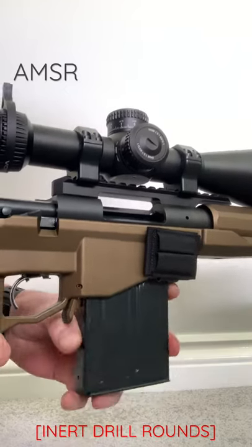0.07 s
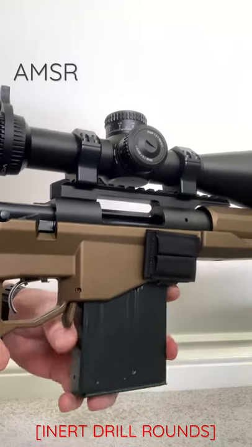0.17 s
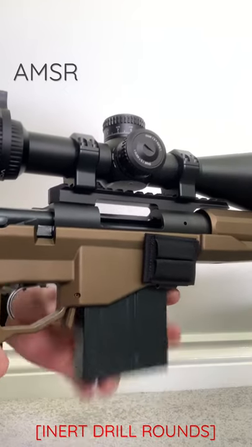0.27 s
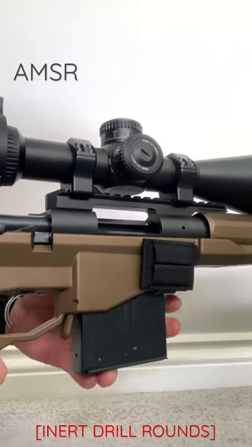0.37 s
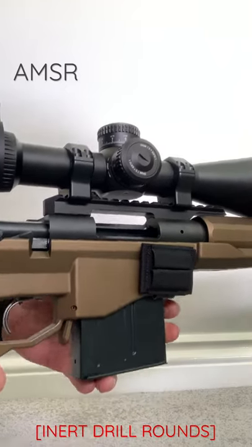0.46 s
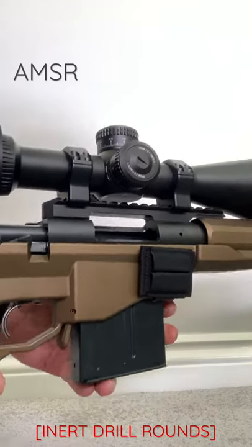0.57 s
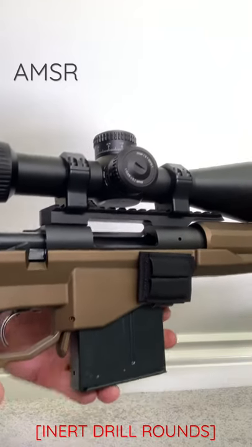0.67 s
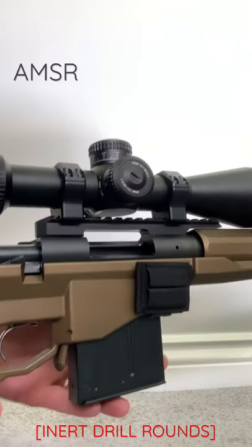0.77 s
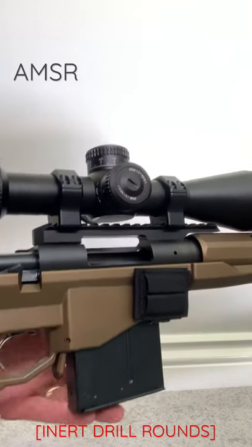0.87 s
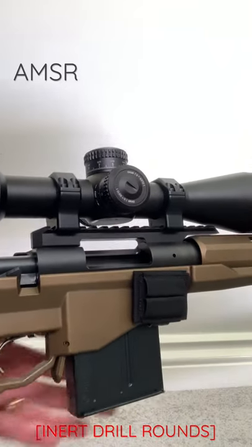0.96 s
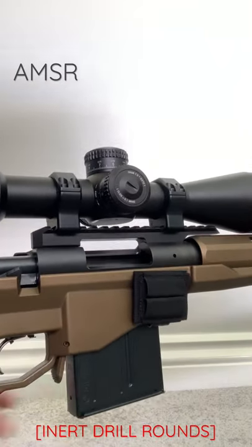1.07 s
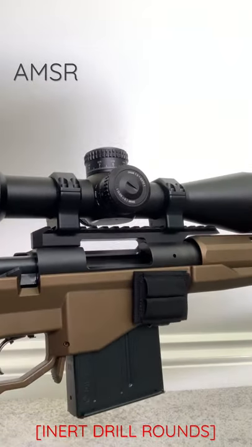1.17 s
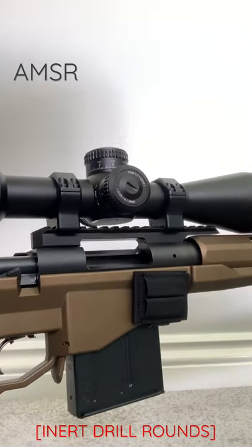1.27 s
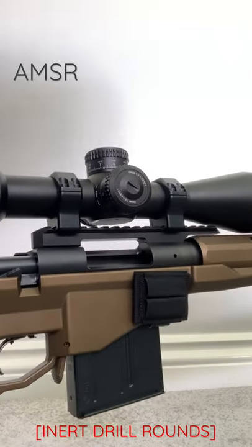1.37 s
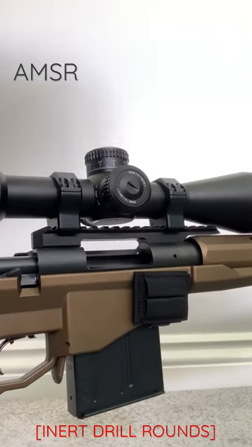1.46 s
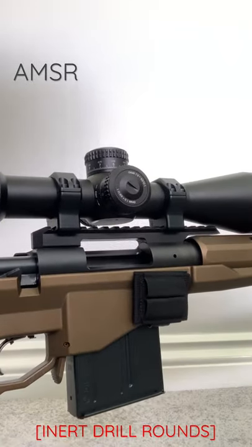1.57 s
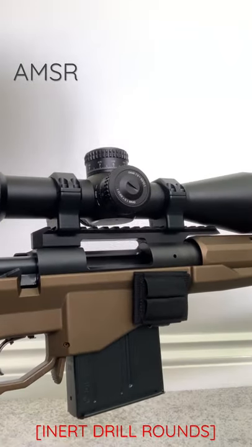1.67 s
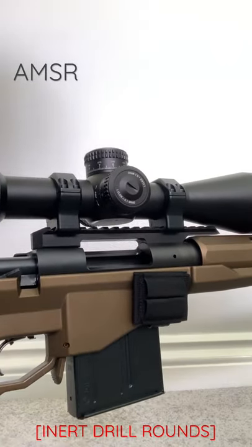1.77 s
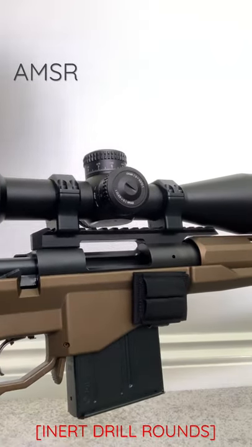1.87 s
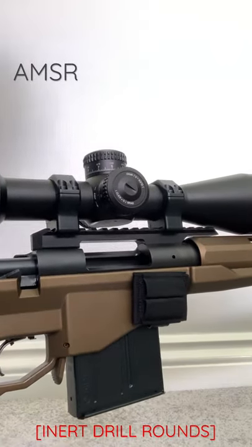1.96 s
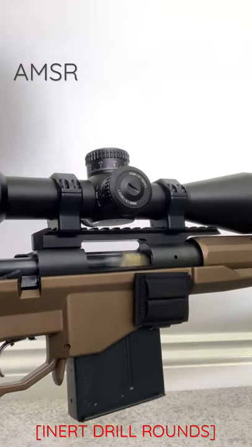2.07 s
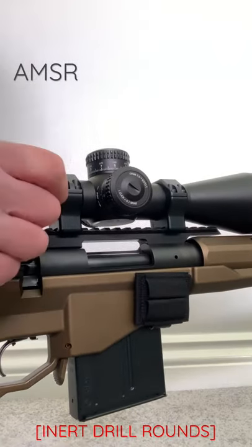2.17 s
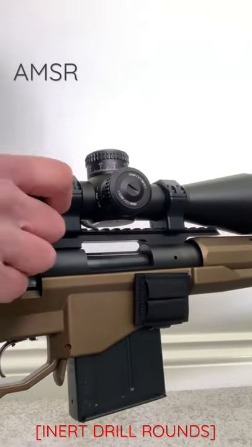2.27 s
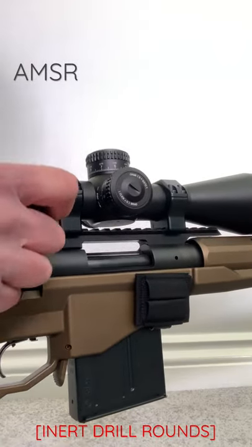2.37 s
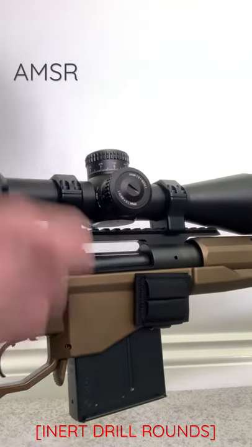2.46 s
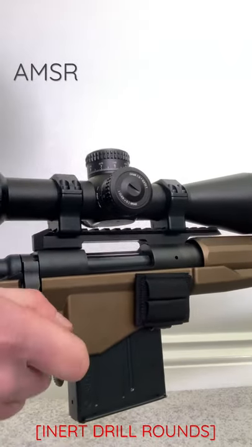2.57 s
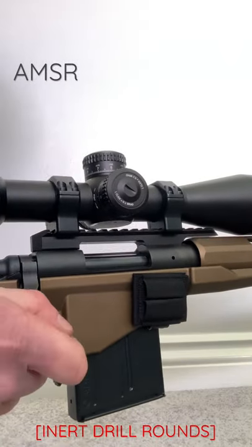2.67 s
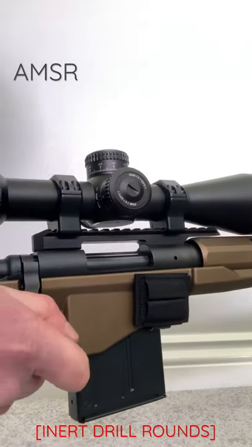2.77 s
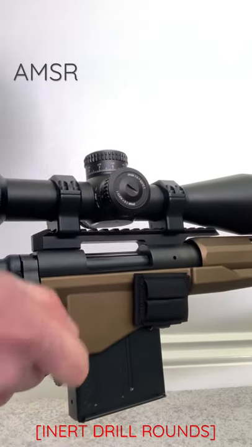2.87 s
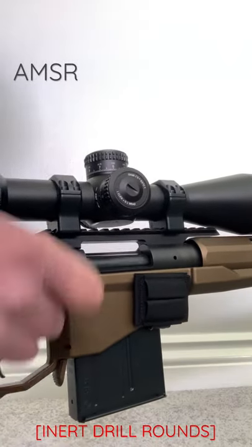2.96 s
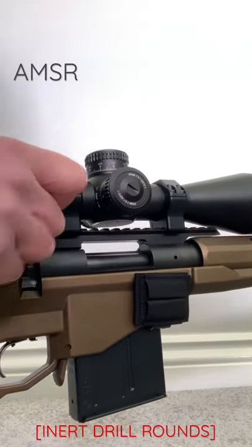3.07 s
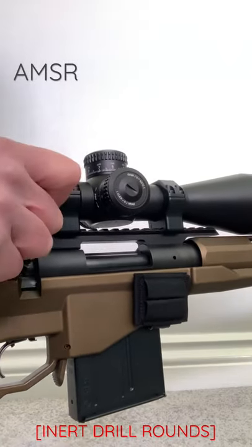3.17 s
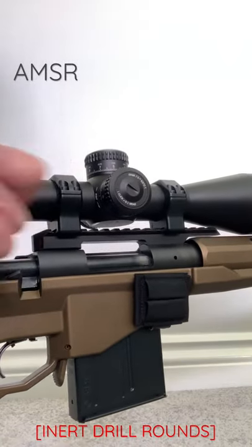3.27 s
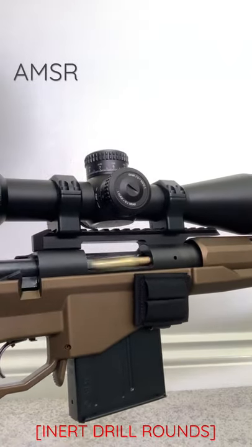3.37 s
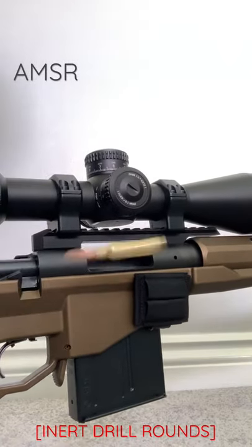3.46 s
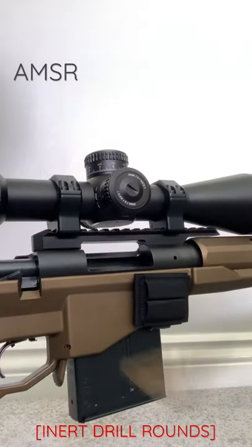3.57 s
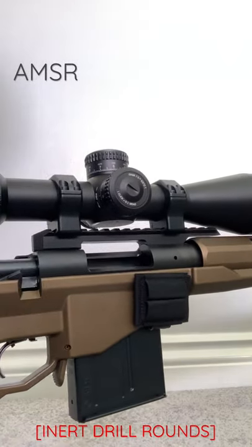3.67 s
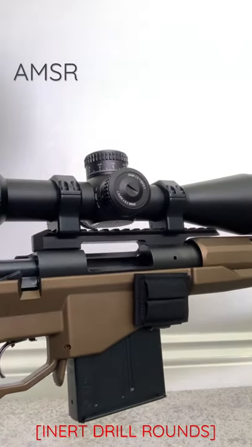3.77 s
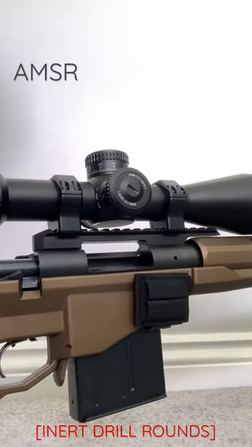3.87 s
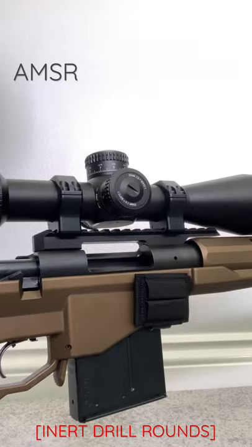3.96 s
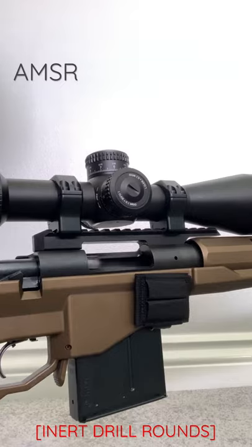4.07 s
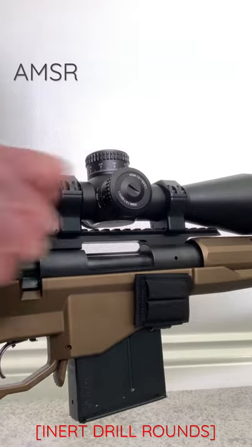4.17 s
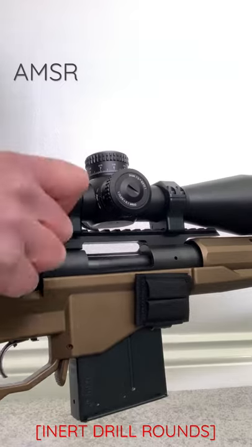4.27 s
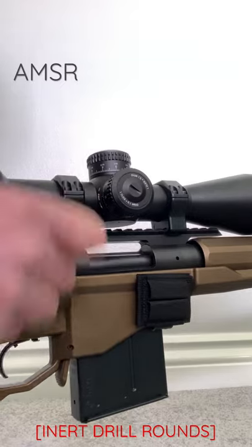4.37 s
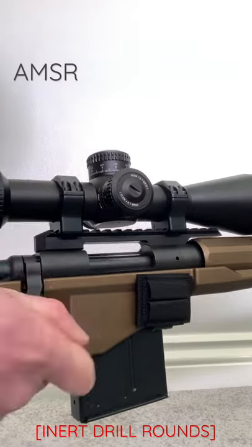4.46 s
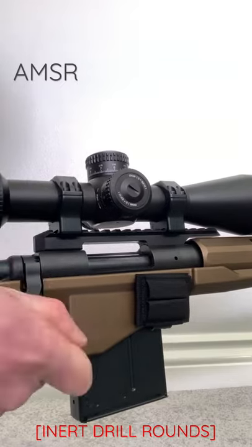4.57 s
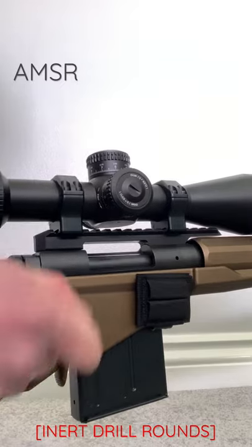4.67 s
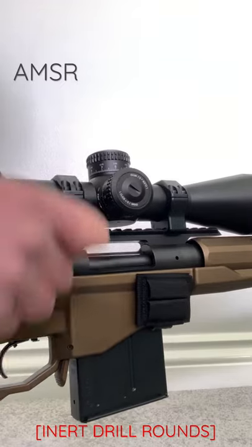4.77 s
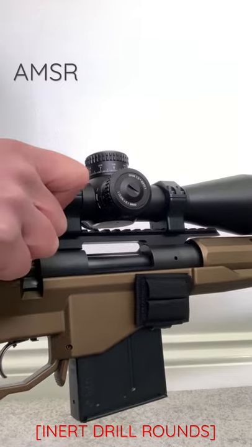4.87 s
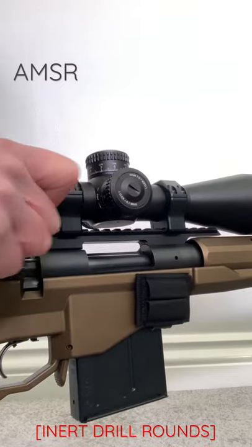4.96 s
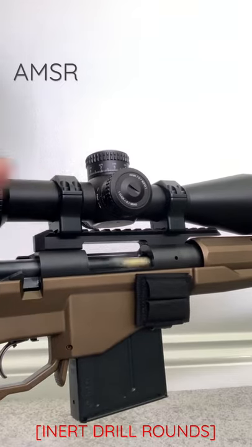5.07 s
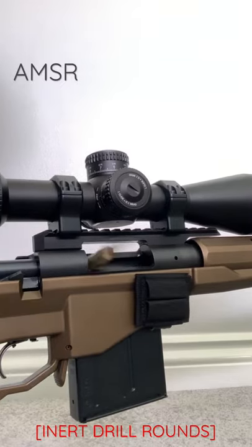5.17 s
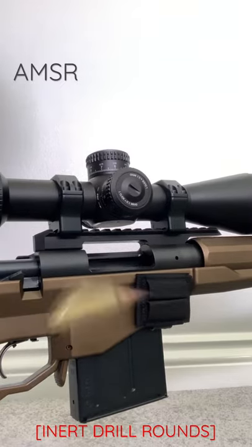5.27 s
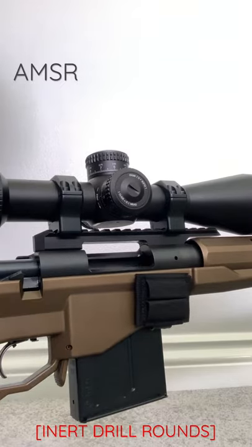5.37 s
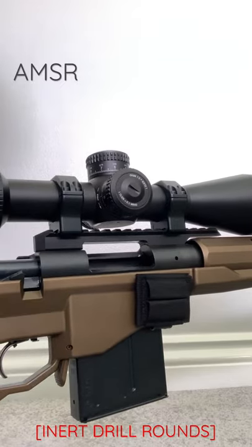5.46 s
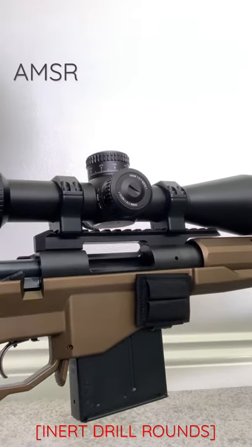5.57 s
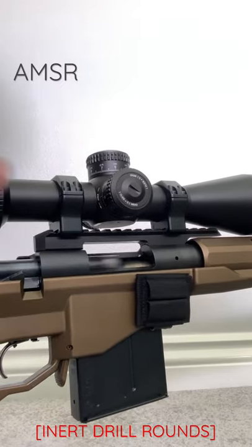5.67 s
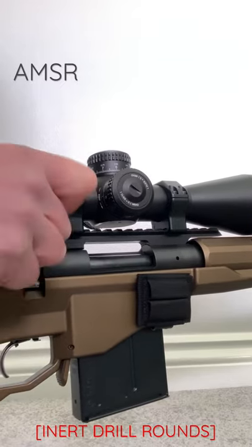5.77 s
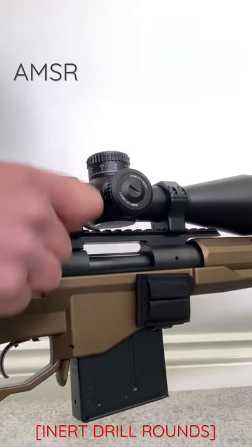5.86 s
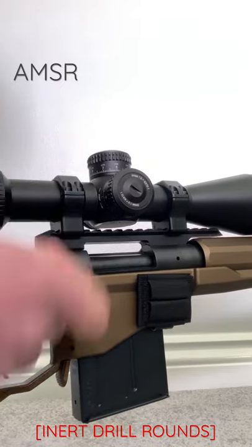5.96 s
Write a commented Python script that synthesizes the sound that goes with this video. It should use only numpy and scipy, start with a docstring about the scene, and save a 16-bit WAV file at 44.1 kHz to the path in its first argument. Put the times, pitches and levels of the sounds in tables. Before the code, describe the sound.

A magazine scrapes and clicks into a rifle, then the steel bolt is worked three times with sharp clacks and slides in a small room.

```python
"""A magazine scrapes and clicks into a bolt-action rifle, then the bolt is worked three times.
Steel parts slide, snap against their stops and ring. The rifle rocks on a carpeted floor and its
stock thumps. Two ejected brass rounds ring as they tumble through the air, then thud on the carpet.
A small room echoes, and a microphone with two openings (ports) hears it all in stereo."""
import sys
import numpy as np
from scipy import signal
from scipy.fft import rfft, irfft, next_fast_len
from scipy.io import wavfile
from scipy.ndimage import uniform_filter1d

SR = 44100
rng = np.random.default_rng(int(sys.argv[2]) if len(sys.argv) > 2 else 0)


def unload_wav(signal):
    """Save mono or channel-first audio to the path in sys.argv[1] as 16-bit WAV at rate SR, clipped to [-1, 1]."""
    wavfile.write(
        sys.argv[1],
        SR,
        np.round(np.clip(np.atleast_2d(signal).T, -1, 1) * 32767).astype(np.int16),
    )


N = 265923

# Movements of magazine, hand and bolt:
# start_s, length_s, end_friction_db, swell_db, end_hollow_hz, end_brightness_db
STROKES = [(0, .1, -56, -19, 1320, -4), (0.22, .07, -31, 29, 1200, 3),
           (0.362, .19, -61.5, -6.5, 1736, -1.5), (0.698, .3, -59, 12.5, 1750, -3),
           (1.01, .08, -52.5, 0, 1820, -2), (1.282, .08, -64, -2.5, 2015, 3.5),
           (1.368, .075, -48.5, 11.5, 1616, -9), (1.503, 0.28, -60.5, 0.5, 1510, -8),
           (1.977, .13, -31.5, 8, 1480, 0.5), (2.462, 0.051, -42.5, -11, 1310, 0),
           (2.886, .2, -40, 18, 1205, -2.5), (3.18, .25, -28.5, 24.5, 1245, 1),
           (3.793, .09, -50.5, -10, 1400, 0.5), (3.996, 0.16, -34.5, 17, 1096, -2),
           (4.349, .1, -45.5, -3.5, 1243, -2.5), (4.67, .19, -43.5, 9, 1187, -3.5),
           (4.947, .21, -29, 24, 1106, 2.5), (5.408, 0.031, -41, 3.5, 1106, -4.5),
           (5.56, .18, -30.5, 28, 949, 1.5), (5.874, .15, -46, 0, 943, -9)]
# The tones at which the rifle's steel likes to ring: pitch_hz, width_hz, level_db
STEEL_TONES = [(528, 30, -8.5), (867, 34, -7), (1069, 37, -5.5), (1310, 95, -0.5), (2564, 150, 2),
               (2884, 130, -2), (3408, 120, 2), (3760, 390, -5), (4190, 430, -1), (4808, 110, -5),
               (6720, 360, -8.5), (7970, 170, -5.5), (12000, 350, -3.5), (13400, 450, -16),
               (13540, 240, -7.5), (17400, 300, -3)]
# How far the left port lags behind the right: frequency_hz, lag_radians
PORT_LAG = [(0, 0), (400, .6), (900, 1.2), (1500, 1.3), (2300, 2.6), (3300, 6.2), (4500, 6.7), (6500, 7.6),
            (8000, 8.6), (9500, 9.4), (11000, 9.9), (12500, 11), (14200, 12.57)]


def amp(db):
    """Turns decibels into a number to multiply by."""
    return 10 ** (np.asarray(db) / 20)


def unit(x):
    """Scales a signal to an average (rms) level of 1."""
    return x / np.sqrt(np.mean(x ** 2) + 1e-20)


def read(points, hz):
    """Looks up values between a table's rows, on a logarithmic frequency scale."""
    f, value = np.transpose(points)
    return np.interp(np.log(hz + 1), np.log(f + 1), value)


def fade(t, fade_s):
    """Dies away by 60 dB in fade_s seconds."""
    return np.exp(-np.log(1000) * t / max(fade_s, 1e-3))


def add(mix, start_s, sound):
    """Mixes a sound in at its start time."""
    part = mix[:, max(round(start_s * SR), 0):][:, :sound.shape[-1]]
    part += sound[..., :part.shape[1]]


def unsteady(size, span_s, depth_db):
    """A gain that wanders at random, changing over about span_s."""
    width = max(round(span_s * SR), 2)
    wander = uniform_filter1d(uniform_filter1d(rng.standard_normal(size), width), width)
    return amp(depth_db * np.clip(unit(wander), -2, 2))


def port_lag(hz):
    """The left port's lag in radians at this frequency."""
    return np.interp(hz, *np.transpose(PORT_LAG))


def ports(pair, colour):
    """Turns two unrelated noises into what the ports hear; colour gives each frequency's gain."""
    # How alike the ports sound: frequency_hz, likeness (0 to 1)
    likeness = [(100, 0.95), (400, 0.22), (1000, 0.9), (2000, 0.93), (2700, 0.77), (3500, 0.28),
                (5500, 0.22), (7000, 1), (9000, 0.99), (10500, 0.99), (12500, 0.46), (14500, 1)]
    # How much louder the left port is: frequency_hz, level_db
    balance = [(50, 3), (200, 3), (700, 3), (1400, 0), (2800, 1), (5000, 0), (15000, -0.5)]
    size = pair.shape[1]
    hz = np.fft.rfftfreq(size, 1 / SR)
    common, separate = rfft(pair)
    like = np.clip(read(likeness, hz), 0, 1)
    side = amp(read(balance, hz) / 2)
    left = (like * common + np.sqrt(1 - like ** 2) * separate) * np.exp(-1j * port_lag(hz))
    return irfft(np.array([left * side, common / side]) * colour(hz), size)


def peak(f, hz, width_hz):
    """One resonance: passes frequencies near hz and weakens the rest."""
    return 1 / (1 + 2j * (f - hz) / width_hz)


def steel_colour(f):
    """The rifle's steel boosts sound near its own tones."""
    return 1 + sum(amp(db) * peak(f, hz, width) for hz, width, db in STEEL_TONES)


def hand_motion(t, grip_s=0.022, release_s=0.18, sag_hz_per_s=800):
    """The hand moves each part: gives push (0 to 1), friction, hollow pitch and brightness."""
    start, length, db, swell_db, end_hz, end_bright_db = np.transpose(STROKES)[:, :, None]
    to_go = np.clip(start + length - t, 0, length)
    push = np.clip((t - start) / grip_s, 0, 1) * fade(np.maximum(t - start - length, 0), release_s)
    speed_db = -swell_db * to_go / length
    friction = push * amp(db + speed_db) + 1e-12
    share = friction / friction.sum(0)
    hollow_hz = (share * (end_hz + sag_hz_per_s * to_go)).sum(0)  # falls as the part travels
    bright_db = (share * (end_bright_db + 0.23 * speed_db)).sum(0)  # faster is brighter
    return push.max(0), friction.sum(0), hollow_hz, bright_db


def sliding(catches_per_s=900, catch_s=.0006, stutter_db=2.0, hollow_db=10, level_db=-1):
    """Rubbing parts catch and slip, sounding through the steel; a hollow tone moves with them."""
    # The tone of the rubbing: frequency_hz, level_db
    rub_colour = [(150, -11.5), (400, -10), (800, -2), (1250, -7), (1800, -1), (2400, -6.5), (3500, -9.5),
                  (6000, -11.5), (10000, -18.5), (13500, -16), (16000, -26.5)]
    catches = (rng.random(N) < catches_per_s / SR) * np.minimum(rng.exponential(1, N), 2)
    grip = 1 + signal.lfilter([1], [1, -np.exp(-1 / (catch_s * SR))], catches)
    stutter = unit(uniform_filter1d(uniform_filter1d(rng.standard_normal(N), 300), 200))
    grip *= amp(stutter_db * stutter)
    rub = ports(rng.standard_normal((2, N)) * grip, lambda f: steel_colour(f) * amp(read(rub_colour, f)))
    f, t, spectrum = signal.stft(rub, SR, nperseg=512)
    _, friction, hollow_hz, bright_db = hand_motion(t)
    pressed = np.clip((20 * np.log10(friction) + 62) / 12, .15, 1)  # a light touch barely rings
    hollow = 1 + pressed * amp(hollow_db) * abs(peak(f[:, None], hollow_hz, width_hz=200)) ** 2
    treble = amp(bright_db * np.clip((f[:, None] - 1500) / 1500, 0, 1))
    scrape = signal.istft(spectrum * hollow * treble, SR, nperseg=512)[1][:, :N]
    return amp(level_db) * unit(scrape) * np.interp(np.arange(N) / SR, t, friction)


def contacts(bounce_db=-2.5, tick_db=-12, tick_fade_s=0.041):
    """Lists every steel hit, any bounce after it, and two faint ticks along each stroke."""
    # Steel meeting steel: start_s, level_db (at 2-8 kHz), body_db, clack_db, zing_db (all three
    # added to level_db), fade_s, hollow_hz, bounce_after_s (0 for none)
    hits = [(0.0046, -36, -18.5, 1, -3.5, 0.0071, 1340, 0.0011),
            (0.0552, -47.5, -6, 7, -8.5, .034, 734, 0.00051),
            (0.1783, -59.5, 7, 9, -7.5, 0.18, 890, 0.0012),
            (0.2831, -27, -15.5, 1.5, -10, 0.1, 1350, 0.00064),
            (0.2969, -14.5, -31.5, -7.5, -11, 0.015, 1470, .005),
            (1.0096, -47.5, -3.5, -3.5, -9, 0.035, 1635, 0), (1.632, -68, 12, 11, -15, .04, 1410, 0),
            (1.7809, -19, -27, -12.5, -5, 0.018, 1360, 0), (1.8732, -53, 8.5, 12.5, -26.5, 0.12, 680, 0),
            (1.9993, -31, 3, 8, -9.5, 0.11, 1615, .006),
            (2.055, -20.5, -19.5, -8.5, -13, 0.052, 1930, 0.0019),
            (2.0717, -18.5, -28.5, 3.5, 0, 0.024, 1050, .0066),
            (2.161, -27.5, -13.5, -8, -1.5, 0.051, 1290, 0.00044),
            (2.227, -39, -8.5, -6, -27, 0.11, 1340, 0), (2.3303, -46.5, 1.5, 3.5, -26, 0.094, 1195, 0),
            (2.4679, -23, -5.5, -3.5, -4, 0.042, 1240, .0035), (2.5577, -40, -6, 1.5, -11, 0.047, 670, 0),
            (2.8668, -64, 13, 13.5, -18, 0.053, 726, 0), (2.8847, -60.5, 13.5, 0.5, -4.5, 0.066, 1820, 0),
            (2.921, -50.5, 8, 12.5, -8, 0.034, 600, 0), (3.025, -37, -13, 8.5, -1, 0.055, 1220, 0.00055),
            (3.0409, -28.5, -2.5, -1, -20, 0.086, 1090, 0.00095),
            (3.067, -18, -6, -7.5, -1, 0.027, 1250, .004), (3.3067, -21.5, -22.5, -11, -7, 0.043, 1200, 0),
            (3.3216, -29.5, -21, 2.5, -9.5, 0.052, 1210, 0),
            (3.3676, -21.5, -5.5, -4.5, 3.5, 0.028, 1270, .009),
            (3.4147, -31.5, -11, -13.5, -2, 0.024, 1290, .006),
            (3.4281, -21, -0.5, .5, 2, 0.035, 743, .0058), (3.6454, -62, 1, 8.5, 5.5, .047, 688, 0.002),
            (3.7932, -27.5, -8, -7, -4, 0.027, 1154, 0), (3.8705, -36, -15, 3.5, -13, 0.075, 1130, .01),
            (4.0045, -47.5, 9, 8, -12.5, 0.076, 680, 0), (4.1, -22.5, -10.5, -1.5, -9, 0.08, 1290, .009),
            (4.1172, -17, -13, 4.5, 1, 0.031, 1060, .0076), (4.199, -28, -9, -1, -7, 0.051, 1250, 0),
            (4.343, -44, -1.5, 9, -21, 0.075, 1340, 0), (4.3673, -29.5, -4.5, -2, -3.5, 0.047, 930, .006),
            (4.4263, -55, -4.5, 16, -15.5, 0.032, 1270, 0), (4.4729, -30, -3, 6.5, -4, 0.034, 1170, 0),
            (4.6394, -59.5, 11.5, 12, -12, 0.041, 927, .0136),
            (4.6774, -49, 1, 6.5, -8.5, .041, 1030, 0.00017),
            (4.6937, -37, -10.5, 5.5, -16.5, 0.031, 940, .004),
            (4.796, -30, -3.5, 0, -11.5, 0.056, 1340, 0.00073),
            (4.8175, -25.5, -11, -7, -12, 0.018, 1170, 0.00011),
            (4.8225, -17.5, -15, -8, 0.5, 0.045, 690, 0), (5.062, -26, -30, -6, -10, 0.033, 1350, 0),
            (5.0749, -35, -14, 4, -30, 0.026, 990, 0), (5.116, -24.5, -4.5, -4, 5, 0.039, 1300, .0066),
            (5.145, -25, -17, 5.5, -6, 0.039, 1026, 0.0041), (5.1638, -23.5, -1, 5, 0.5, 0.039, 1040, .003),
            (5.4142, -37, -2.5, -16, 2.5, 0.03, 1300, 0.00027),
            (5.4752, -51.5, -1.5, 13.5, -5.5, 0.071, 1070, 0.0015),
            (5.6527, -43.5, -10, 10, -10, 0.12, 1210, 0.00047),
            (5.6691, -26, -28, -2.5, -15, 0.062, 920, .006),
            (5.6818, -14.5, -19.5, 1, 0.5, 0.072, 933, .008), (5.7018, -20.5, -28, -15, 2.5, .12, 930, 0),
            (5.7632, -26, -5, -3, -7, 0.043, 905, 0.00097), (5.8855, -47, 1, 5.5, -26, 0.1, 950, 0.003),
            (5.92, -35, -11, -28, 3.5, 0.041, 1020, 0)]
    rows = []
    for start, db, *tone, bounce_after in hits:
        rows.append((start, db, *tone))
        if bounce_after > 0:
            rows.append((start + bounce_after, db + bounce_db, *tone))
    tick_colour_db = (4.5, 8, -8)  # body, clack, zing
    for start, length, db, swell_db, hz, _ in STROKES:
        for along in rng.random(2):
            friction_db = db - swell_db * (1 - along)
            rows.append((start + along * length, friction_db + tick_db, *tick_colour_db, tick_fade_s, hz))
    return rows


def clicks(lead_db=-22, hollow_db=11, favoured_db=4, ring_db=-24):
    """Parts scrape together, then chatter in a clump of tiny impacts; brief hits start most sharply."""
    # Borders of the body, clack, steel and zing bands: frequency_hz
    edges = [180, 600, 2000, 8000, 15800]
    bands = [signal.butter(3, pair, "band", fs=SR, output="sos") for pair in zip(edges, edges[1:])]
    stretches, trims_db = [1.9, 0.91, 0.96, 0.54], [-2.6, 0.032, 0.043, 0.053]  # the body lasts longest
    out, t = np.zeros((2, N)), np.arange(-512, 5632) / SR
    f, after = np.fft.rfftfreq(len(t), 1 / SR), np.maximum(t, 0)
    steel = steel_colour(f)
    steel_pitches = [hz for hz, _, _ in STEEL_TONES if edges[2] < hz < edges[3]]
    energy_scale = np.sqrt(.01 * SR / len(t))  # levels count a hit's energy as spread over 10 ms
    for start, db, body, clack, zing, fade_s, hollow_hz in contacts():
        favoured = amp(favoured_db) * peak(f, rng.choice(steel_pitches), width_hz=200)
        hollow = amp(hollow_db) * peak(f, hollow_hz, width_hz=90)
        approach = amp(lead_db) * np.exp(-abs(t) / (0.097 * fade_s))
        rise = 1 - np.exp(-(after / max(0.012 * fade_s, .0006)) ** 2)
        grains = rng.standard_normal((2, len(t))) * unsteady(len(t), span_s=0.00042, depth_db=3)
        chatter = ports(grains, lambda hz: steel * (1 + hollow + favoured))
        for band, band_db, stretch, trim_db in zip(bands, (body, clack, 0, zing), stretches, trims_db):
            decay = fade(after, fade_s * stretch) + amp(ring_db) * fade(after, fade_s=.05)
            hit = signal.sosfilt(band, chatter * (approach + rise * decay))
            add(out, start + t[0], amp(db + band_db + trim_db) * unit(hit) * energy_scale)
    return out


def with_ringing(hits, ring_db=-5):
    """The steel rings on for a few hundredths of a second after each hit."""
    size = next_fast_len(N + SR // 4)
    f = np.fft.rfftfreq(size, 1 / SR)
    tones = sum(peak(f, hz, width_hz=55) for hz, _, _ in STEEL_TONES)
    return hits + amp(ring_db) * irfft(rfft(hits, size) * tones, size)[:, :N]


def pings(beat_hz=9, twin_gain=0.36, rise_s=.0005):
    """Small steel parts ring with two close tones that waver against each other."""
    # Parts such as the magazine catch and spring: start_s, level_db, pitch_hz, fade_s
    small_parts = [(0.3, -54.5, 790, 2.2), (0.3, -63, 1310, .7), (0.25, -59, 1967, .4),
                   (0.299, -16, 3150, 0.018), (1.783, -14, 4560, 0.021), (1.782, -46, 4400, .18),
                   (3.796, -20.5, 5060, 0.046), (5.415, -7, 4260, 0.0068), (5.685, -4, 937, 0.057)]
    out, t = np.zeros((2, N)), np.arange(SR // 2) / SR
    window = (1 - np.exp(-t / rise_s)) * (1 - (t / t[-1]) ** 2)
    for start, db, hz, fade_s in small_parts:
        phase = 2 * np.pi * hz * t - np.array([[port_lag(hz)], [0]])
        pair = np.sin(phase) + twin_gain * np.sin(phase + 2 * np.pi * beat_hz * t)
        add(out, start, amp(db) * pair / (1 + twin_gain) * fade(t, fade_s) * window)
    return out


def rocking(rest_db=-72.5, push_db=-66):
    """The rifle rumbles on its rest, swelling when the hand shifts its weight or pushes a part."""
    # Shifts of weight: middle_s, length_s, level_db
    shifts = [(0.953, 0.71, -60.5), (1.446, 0.26, -51.5), (1.71, 0.22, -43.5), (1.83, 0.28, -49),
              (2.342, 0.14, -52), (2.583, .14, -48.5), (3.102, 0.16, -41), (3.5, 0.7, -48),
              (4.103, 0.92, -52), (4.723, 0.23, -50.5), (4.85, 0.14, -42), (5.652, 0.11, -40),
              (5.807, 0.31, -50.5)]
    # The tone of the rumble: frequency_hz, level_db
    rumble_colour = [(20, -17), (50, 4), (110, 1), (160, -5.5), (300, -3.5), (450, -18.5), (700, -19),
                     (2000, -72)]
    t = np.arange(N // 256 + 2) * 256 / SR
    push = hand_motion(t)[0]
    level = amp(rest_db) + amp(push_db) * push
    for middle, length, db in shifts:
        level += amp(db) * np.cos(np.pi * np.clip((t - middle) / length, -.5, .5)) ** 2
    rumble = steady_noise(rumble_colour) * unsteady(N, span_s=0.036, depth_db=3.5)
    return np.interp(np.arange(N) / SR, t, level) * rumble


def thumps(rise_cycles=0.44, roughness=0.5, boom_lag_s=.003, boom_fade_s=0.13):
    """Each dull blow is a ragged knock and a low boom; lower pitches swell more slowly."""
    # Stock, hand and rounds on the carpet: start_s, knock_db, knock_hz, knock_fade_s, boom_db, boom_hz
    blows = [(0.744, -52, 282, 0.088, -72, 150), (1.65, -37.5, 292.4, 0.035, -51.5, 131),
             (1.877, -31, 314, .095, -47.5, 150), (2.014, -23.5, 279, 0.1, -31, 166),
             (2.471, -46, 385, .034, -30.5, 160), (2.884, -31.5, 159, 0.033, -52.5, 110),
             (3.07, -22.5, 395, 0.038, -26.5, 162), (3.306, -26.5, 161, 0.046, -55.5, 110),
             (3.431, -26, 557, 0.1, -39, 135), (3.508, -35.5, 295, 0.088, -36, 158),
             (3.646, -11, 338, 0.045, -19, 96), (3.886, -22.5, 241, 0.041, -26.5, 113),
             (3.938, -42.5, 273, .06, -32, 135), (4.027, -35, 166.5, 0.13, -39, 79),
             (4.375, -28.5, 152, 0.055, -50.5, 85), (4.471, -16, 540, 0.023, -33.5, 160),
             (4.48, -42, 289.5, 0.62, -25.5, 87), (4.824, -23, 382, 0.11, -24.5, 167),
             (5.161, -19.5, 172, 0.045, -53, 110), (5.386, -25.5, 409, 0.041, -20.5, 133),
             (5.635, -20.5, 142.6, 0.062, -37, 85), (5.915, -51, 293, 0.056, -34.5, 186)]
    out, t = np.zeros((2, N)), np.arange(SR // 3) / SR
    f = np.fft.rfftfreq(len(t), 1 / SR)
    side_lag, side_gain = np.array([[.9], [0]]), amp([[1.2], [-1.2]])  # left, right
    for start, *knock, boom_db, boom_hz in blows:
        for delay, db, hz, fade_s in (0, *knock), (boom_lag_s, boom_db, boom_hz, boom_fade_s):
            near_pitch = np.exp(-((f - hz) / (.45 * hz)) ** 2)
            ragged = unit(irfft(rfft(rng.standard_normal((2, len(t)))) * near_pitch, len(t)))
            tone = np.sin(2 * np.pi * hz * t - side_lag) * side_gain
            swell = 1 - np.exp(-(t * hz / rise_cycles) ** 2)
            add(out, start + delay, amp(db) * (tone + roughness * ragged) * swell * fade(t, fade_s))
    return out


def flying_brass(swing_depth=0.8):
    """An ejected round rings, its loudness swinging as it tumbles."""
    # Rounds in the air: start_s, level_db, pitch_hz, fade_s, tumble_hz
    rounds = [(3.433, -18.5, 10480, 0.36, 17), (5.164, -18, 10610, 0.34, 13.9)]
    # A round's higher tones: pitch_multiple, relative_db, fade_s
    overtones = [(1.244, -7.5, 0.16), (1.262, -4.5, 0.11), (1.425, -18.5, .13)]
    out, t = np.zeros((2, N)), np.arange(SR // 2) / SR
    for start, db, pitch_hz, main_fade_s, tumble_hz in rounds:
        swing = 1 + swing_depth * np.cos(2 * np.pi * tumble_hz * t)
        for multiple, relative_db, fade_s in [(1, 0.0084, main_fade_s)] + overtones:
            hz = pitch_hz * multiple
            tone = np.sin(2 * np.pi * hz * t - np.array([[port_lag(hz)], [0]]))
            add(out, start, amp(db + relative_db) * swing * fade(t, fade_s) * tone)
    return out


def room_echo(sound, first_echo_s=0.0055, build_s=0.0056, echo_db=1, waves_db=-1):
    """A small room returns a blur of echoes, and low tones linger between its walls."""
    # The blur of echoes: frequency_hz, level_db, fade_s
    echoes = [(100, 0.5, 0.5), (302, -13, 0.11), (579.4, -12.5, 0.18), (1150, -13.5, 0.031),
              (2015, -3, 0.37), (3020, -15.5, 0.3), (5000, -12.5, 0.28), (7800, -14.5, 0.22),
              (11000, -16, .22), (14990, -16.5, 0.25)]
    # The room's low standing waves: pitch_hz, level_db, fade_s
    standing_waves = [(83, -15, 0.38), (113, -22, 0.56), (172, -8, 0.13), (298, -4, 0.32),
                      (507.5, -12.5, 0.12)]
    t, rows = np.arange(SR) / SR, np.array(echoes)
    f, times, spectrum = signal.stft(rng.standard_normal((2, SR)), SR, nperseg=256)
    level = amp(read(rows[:, :2], f)[:, None] + echo_db)
    decay_rate = np.log(1000) / read(rows[:, ::2], f)[:, None]
    spectrum = spectrum * level * np.sqrt(2 * decay_rate / SR) * np.exp(-decay_rate * times)
    blur = signal.istft(spectrum, SR, nperseg=256)[1][:, :SR]
    tail = ports(blur * np.clip((t - first_echo_s) / build_s, 0, 1), np.ones_like)
    side_lag = np.array([[1.2], [0]])
    for hz, db, fade_s in standing_waves:
        gain = amp(db + waves_db) * 10 * np.log(1000) / (fade_s * SR)
        tail += gain * fade(t, fade_s) * np.sin(2 * np.pi * hz * t - side_lag)
    return signal.fftconvolve(sound[1:], tail, axes=1)[:, :N]


def steady_noise(colour):
    """Stereo noise shaped by a table of frequency_hz, level_db."""
    return unit(ports(rng.standard_normal((2, N)), lambda f: amp(read(colour, f))))


def room_hush(level_db=-77):
    """The faint, even noise of a still room."""
    # The tone of the hush: frequency_hz, level_db
    hush_colour = [(20, -8), (55, -2.5), (150, -6.5), (400, -31.5), (1500, -5), (5000, -23.5),
                   (16000, -25.5)]
    return amp(level_db) * steady_noise(hush_colour)


def scene(brass_echo_db=-12):
    """The rifle in its room; the rounds fly close to the microphone, so they have little echo."""
    rifle = sliding() + thumps() + pings() + with_ringing(clicks())
    rounds = flying_brass()
    echo = room_echo(rifle + amp(brass_echo_db) * rounds)
    return rifle + rounds + echo + rocking() + room_hush()


def record(dry, lowest_hz=42, highest_hz=16100, ceiling=.95):
    """The microphone drops deep bass, gently squashes loud peaks and cuts the highest treble."""
    bass_cut = signal.sosfilt(signal.butter(4, lowest_hz, "high", fs=SR, output="sos"), dry)
    squashed = bass_cut / (1 + (bass_cut / ceiling) ** 4) ** (1 / 4)
    treble_filter = signal.firwin(301, highest_hz, window=("kaiser", 9), fs=SR)
    return signal.oaconvolve(squashed, treble_filter[None], "same")


dry = scene()
out = record(dry)
unload_wav(out)
```